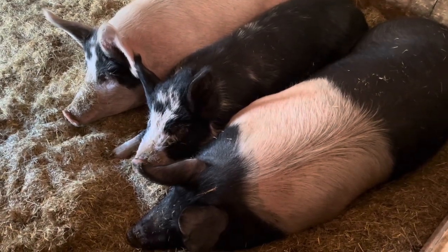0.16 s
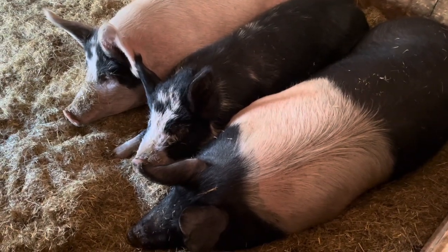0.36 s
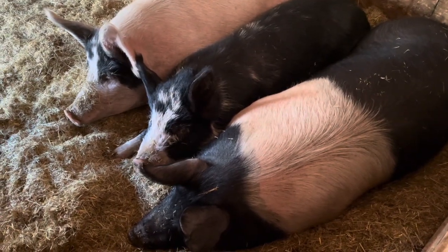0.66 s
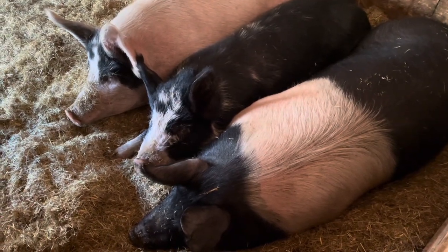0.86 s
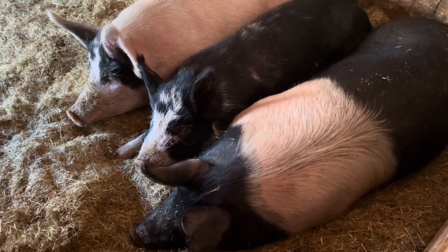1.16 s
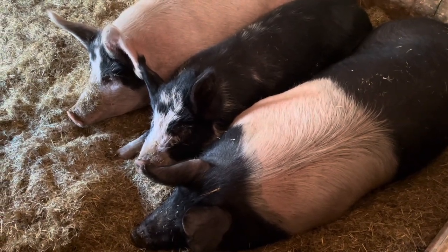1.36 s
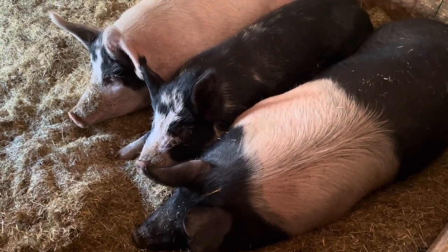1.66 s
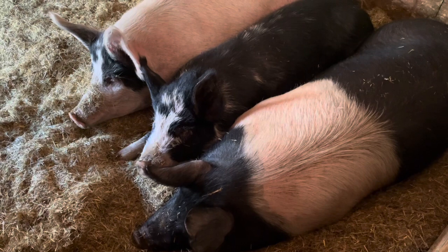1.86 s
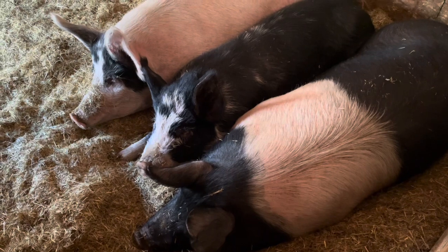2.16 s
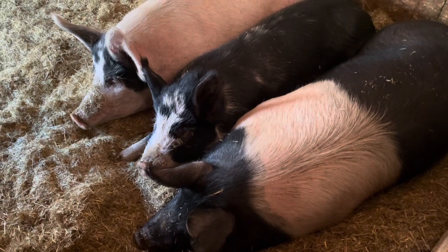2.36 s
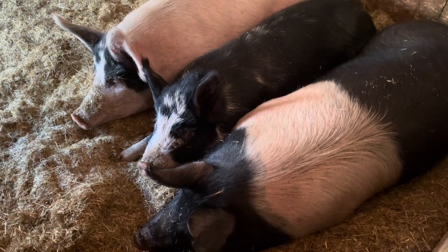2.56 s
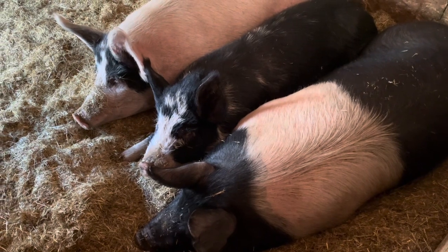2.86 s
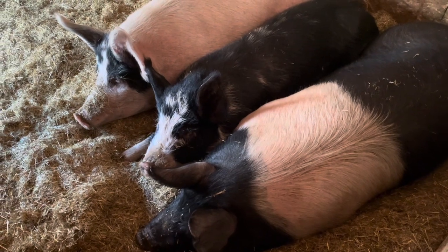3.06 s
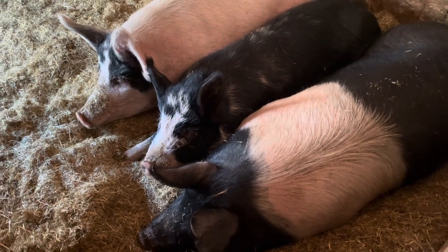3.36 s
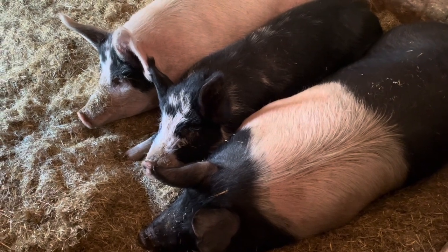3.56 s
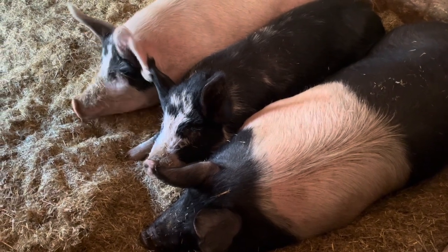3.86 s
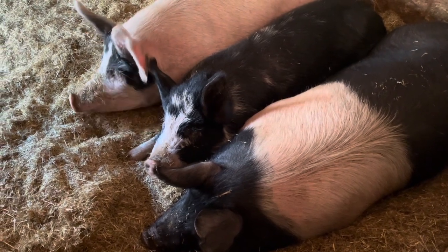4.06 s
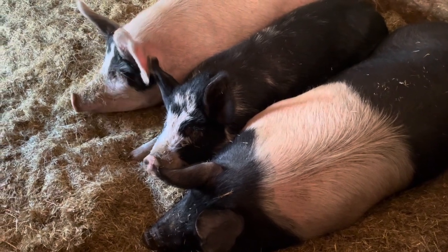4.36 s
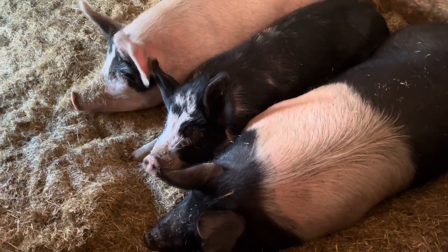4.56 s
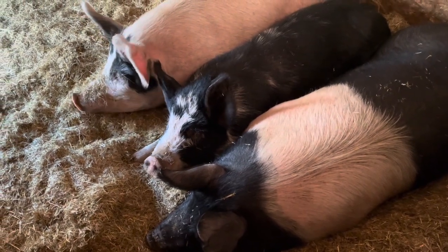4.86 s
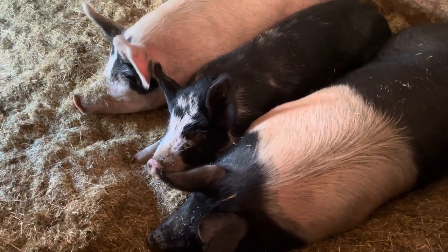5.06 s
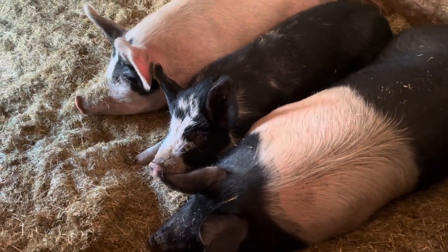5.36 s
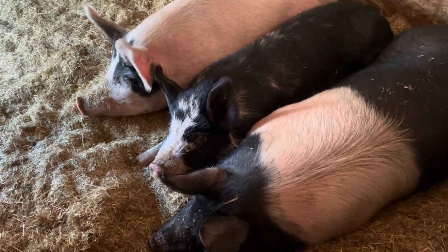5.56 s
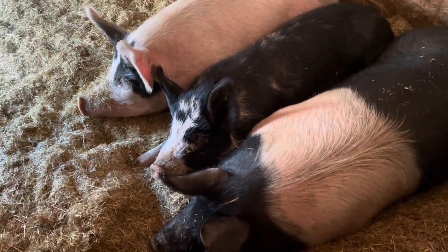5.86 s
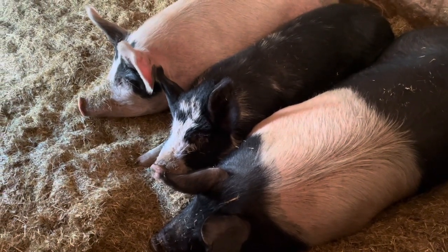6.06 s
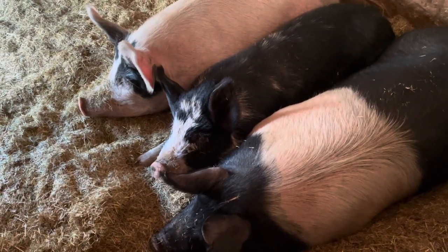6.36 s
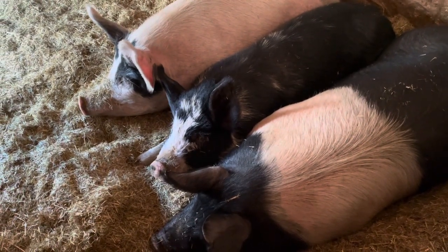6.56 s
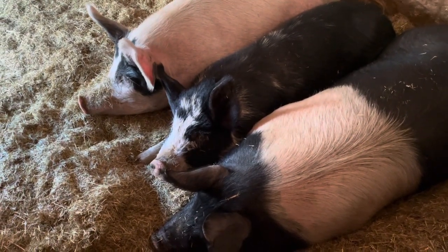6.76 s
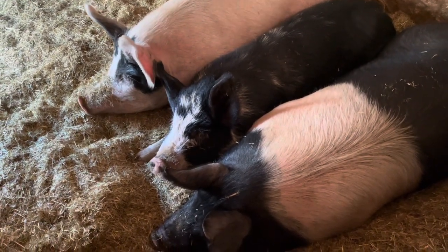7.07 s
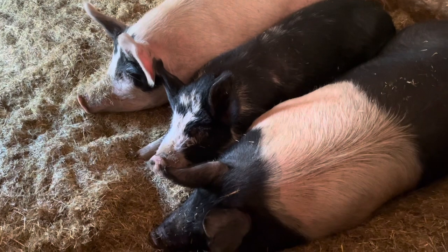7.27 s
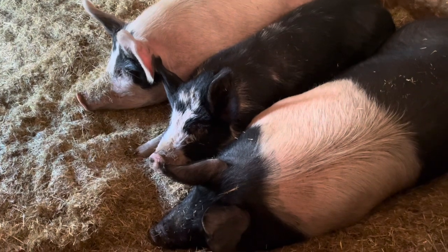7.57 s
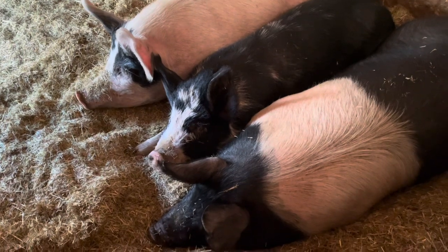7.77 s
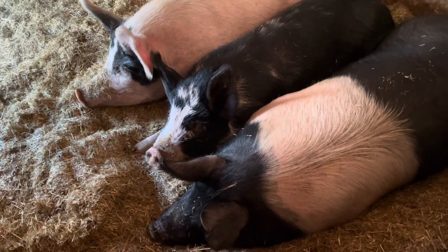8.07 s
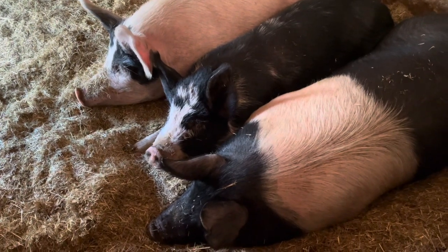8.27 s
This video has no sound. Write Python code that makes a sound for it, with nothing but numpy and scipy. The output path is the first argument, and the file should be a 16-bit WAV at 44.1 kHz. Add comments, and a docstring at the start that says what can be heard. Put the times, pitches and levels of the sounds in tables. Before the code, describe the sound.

A knock on boards opens a breezy barn scene, heard through a close, unprotected stereo microphone. A little electric motor whirs, then winds up longer and louder amid thick fluttering wind pops, ending in a sharp scrape. A quieter lull holds scattered gusts and a brief distant rattle of steel. Three short motor whines follow, with wheel hiss, skids and low drumming, over soft hum and airy hiss.

```python
"""Electric cart in a windy barn

Inside a breezy barn, with a small electric cart driving close by in five short bursts. Its gears whine with the
speed and its controller whistles at a fixed pitch: both are sums of sines. Its wheels hiss through straw (coloured
noise) and drum on boards (resonances). Wind eddies pop on the two microphone ports as short falling tones over
low noise; farther off a metal latch rattles once as ringing steel, and the barn hums behind it all."""
import sys
import numpy as np
from scipy import signal
from scipy.fft import rfft, irfft, next_fast_len
from scipy.io import wavfile
from scipy.ndimage import uniform_filter1d, map_coordinates

SR = 44100
rng = np.random.default_rng(int(sys.argv[2]) if len(sys.argv) > 2 else 0)


def to_wav(sig):
    """Store sig (one row per channel, or 1-D mono) as 16-bit WAV at the path in sys.argv[1].

    Samples outside -1..1 are clipped; the rate is SR.
    """
    pcm = np.clip(np.atleast_2d(sig), -1, 1) * 32767
    pcm = np.round(pcm).astype(np.int16)
    wavfile.write(sys.argv[1], SR, pcm.T)  # frames by channels


N = 370440  # length [samples]

# The cart's motor runs, one list each: (time [s], gear mesh [Hz], rolling level [dB])
MOTOR_RUNS = [
    [(.19, 1000, -79.5), (.24, 1300, -75), (.32, 1600, -64), (.4, 2110, -58.5), (.5, 2450, -56.5),
     (.62, 2640, -57), (.82, 2720, -55.5), (.9, 2520, -58.5), (1.0, 1810, -62.5), (1.12, 1190, -110)],
    [(1.25, 402, -100), (1.35, 498.5, -68), (1.62, 1360, -55.5), (1.67, 1490, -54), (1.73, 1570, -53),
     (1.81, 1640, -52.5), (1.975, 1660, -51), (2.1, 2380, -49.5), (2.19, 2770, -48), (2.27, 2910, -46),
     (2.4, 3060, -46.5), (2.55, 3170, -46.5), (2.72, 3230, -46.5), (2.9, 3250, -46.5), (2.97, 3000, -48.5),
     (3.05, 2484, -50), (3.12, 1970, -53), (3.19, 1475, -54.5)],
    [(5.43, 788, -98), (5.52, 1200, -67.5), (5.58, 1400, -54), (5.62, 1640, -53), (5.66, 1950, -52),
     (5.72, 2190, -52), (5.8, 2350, -48), (5.88, 2290, -53), (5.94, 2240, -66.5)],
    [(6.54, 1207, -76.5), (6.575, 1453, -57.5), (6.64, 2050, -52), (6.73, 2500, -49), (6.82, 2800, -48),
     (6.98, 3250, -45), (7.06, 3400, -43), (7.18, 3510, -43), (7.25, 3440, -45.5), (7.34, 3200, -67.5)],
    [(7.44, 1835, -64.5), (7.5, 2075, -52), (7.6, 2600, -51), (7.8, 3135, -47.5), (7.9, 3354, -47.5),
     (8.08, 3355, -46.5), (8.16, 3150, -48), (8.26, 2820, -73)],
]
# Tones of the gears: orders of the mesh frequency [ratio]
GEAR_ORDERS = [1, 2, .916, 1.144, 3, 1.432, 1.532, 1.897]
# Balance of the gear tones: (time [s], then the level of each order [dB])
GEAR_LEVELS = [(.2, 1, -6, -12, -20, -30, -30, -30, -30), (.45, 4, -2, -12, -20, -30, -30, -30, -30),
               (.85, 3, -1, -12, -20, -30, -30, -30, -30), (1.0, -6, -6, -12, -20, -30, -30, -30, -30),
               (1.59, -22, -12, -22, -20, -30, -30, -30, -30), (1.64, -4, 8, 6, -14, -14, -30, -30, -30),
               (1.78, -4, 5, 4, -14, -9, -30, -30, -30), (1.84, 2, 5, 1, -14, -3, -30, -30, -30),
               (1.96, 2, 0, 2, -14, -4, -30, -30, -30), (2.06, -3, -20, -1, -12, -30, -30, -30, -30),
               (2.2, 4, -20, 1, -9, -30, -20, -20, -12), (2.4, 2, -20, 1, -2, -30, -14, -14, -5),
               (2.48, -5, -20, -5, 5, -30, -10, -10, -3), (2.75, -3, -20, -2, 4, -30, -3, -7, 0),
               (2.87, -4, -20, -2, 2, -30, -4, -6, 0), (2.95, -8, -20, 3, -14, -30, -14, -12, -12),
               (3.2, -6, -20, 5, -15, -30, -30, -30, -30), (5.52, -6, 0, 4, -20, -30, -30, -30, -30),
               (5.62, 3, 5, 1, -20, -30, -30, -30, -30), (5.7, 0, 1, 3, -20, -30, -30, -30, -30),
               (5.8, -2, -4, -1, -20, -30, -30, -30, -30), (5.95, -4, -14, -4, -20, -30, -30, -30, -30),
               (6.55, -2, -4, -6, -10, -30, -30, -30, -30), (6.85, 0, 0, -2, -2, -30, -20, -20, -30),
               (6.98, 1, -14, -4, -6, -30, -10, -12, -30), (7.06, -8, -20, -12, 3, -30, -2, -5, -30),
               (7.2, -8, -20, -12, 3, -30, -4, -3, -30), (7.3, -12, -20, -14, -12, -30, -12, -8, -30),
               (7.45, -4, -13, -3, -10, -30, -30, -20, -30), (7.8, -5, -20, -6, 0, -30, -20, -2, -30),
               (7.9, -3, -20, 5, 0, -30, -20, -3, -30), (8.07, -3, -20, 7, -4, -30, -20, -6, -30),
               (8.16, -10, -20, -4, -12, -30, -20, -10, -30)]
# Where the whine swells or fades: (centre [Hz], width [Hz], boost [dB])
GEARBOX_RESONANCES = [(1500, 150, 6), (2100, 500, 4), (4020, 100, 7), (5150, 500, 10), (7000, 5000, -14)]
# Switching whistle of the speed controller: (start [s], end [s], level at start [dB], level at end [dB])
WHISTLE_SPANS = [(0.223, .3, -56, -50.5), (.3, 0.803, -49.5, -48), (1.274, 1.678, -65.5, -55),
                 (1.676, 2.147, -56.5, -58.5), (2.15, 2.9, -60.5, -63), (2.4, 2.44, -53, -56),
                 (2.68, 2.737, -52, -55), (5.481, 5.531, -61.5, -52.5), (5.53, 5.815, -64, -57.5),
                 (6.551, 6.974, -55, -55.5), (7.459, 7.539, -63, -53), (7.546, 8.035, -52, -51.5)]
SWITCH_HZ = 3917.5
WHISTLE_RISE_S, WHISTLE_FALL_S = .01, .09  # over 20 dB
USUAL_DB = -50  # the rolling level that the other parts of the cart refer to
WHINE_DB, WHINE_GROWS = -55.5, .75  # dB at the usual rolling level, dB more for each dB of rolling
SWEEP_KHZ_S = 3  # a tone sweeping this fast gets half of a resonance's boost


def motor():
    """Gear orders follow the speed and swell at the gearbox resonances; the controller's pitch stays fixed."""
    mesh_hz = uniform_filter1d(curves(np.vstack(MOTOR_RUNS))[0], size=SR // 28)  # inertia rounds the corners
    sweep_hz_s = np.abs(np.gradient(mesh_hz)) * SR
    shake_hz = 13 + .007 * sweep_hz_s  # the mesh chatters while the speed changes
    mesh_phase = 2 * np.pi * np.cumsum(mesh_hz + shake_hz * wobble(160)) / SR

    gears = 0
    for order, level_db in zip(GEAR_ORDERS, curves(GEAR_LEVELS)):
        tone_db = level_db + 3 * wobble(35) + 2.5 * wobble(12)
        for centre, width, boost_db in GEARBOX_RESONANCES:
            slow = 1 + (boost_db > 0) * sweep_hz_s / 1000 / SWEEP_KHZ_S  # fast sweeps excite it less
            tone_db = tone_db + boost_db * bump(order * mesh_hz, centre, width) / slow
        gears = gears + amp(tone_db) * np.sin(order * mesh_phase)
    gears = gears * amp(WHINE_DB + WHINE_GROWS * (rolling() - USUAL_DB)) * during(MOTOR_RUNS)

    switch_phase = 2 * np.pi * SWITCH_HZ * np.arange(N) / SR + 0.12 * wobble(24)
    spans = [held(*row, WHISTLE_RISE_S, WHISTLE_FALL_S) for row in WHISTLE_SPANS]
    whistle = np.max(spans, axis=0) * amp(3 + .7 * wobble(30))
    octave = amp(-15.5) * np.sin(2 * switch_phase + [[.9], [-.9]])  # reaches the two ports out of step
    third = amp(-34) * np.sin(3 * switch_phase)
    near_left = amp([[2.1], [-2.1]])
    return (gears + whistle * np.sin(switch_phase)) * near_left + whistle * (octave + third)


# Panels of the cart's shell that sing under load: (centre [Hz], width [Hz], level [dB])
SHELL_PANELS = [(1396, 65, -5.5), (1610, 55, -2)]
SING_DB, SING_GROWS = -69.5, 3  # dB at the usual rolling level, dB more for each dB of rolling


def panels():
    """Narrow noise in the shell's panels, growing fast with the load."""
    shaken = amp(1.7 * wobble(15)) * rng.standard_normal((2, N))
    ring = unit(modes(shaken, SHELL_PANELS))
    shared = ring[0] * amp([[1.5], [-1.5]])
    opposed = .4 * ring[1] * [[1], [-1]]
    level = amp(SING_DB + SING_GROWS * (rolling() - USUAL_DB)) * during(MOTOR_RUNS)
    return level * (shared + opposed)


# Rolling while the motor is off: (time [s], rolling level [dB])
COASTING = [(0, -82), (3.27, -44), (3.44, -45.5), (3.58, -77.5), (4.33, -80.5), (4.58, -60), (4.8, -65.5),
            (5.2, -78.5), (8.4, -76)]


def rolling():
    """Rolling level in dB, driven or coasting."""
    driven = [(s, db) for run in MOTOR_RUNS for s, _, db in run]
    return curves(sorted(COASTING + driven))[0]


# Lowest layer of the wheel noise: (frequency [Hz], relative level per Hz [dB])
GRIND_SPECTRUM = [(410, -10.5), (700, 2.5), (870, -13), (1000, -5.5), (1310, -2.5), (1610, -8.5),
                  (1900, -7), (2600, -12), (3400, -24), (5700, -120)]
# Middle layer of the wheel noise: (frequency [Hz], relative level per Hz [dB])
HISS_SPECTRUM = [(1350, -12), (2300, -7.5), (2850, 2), (3750, 1.5), (4300, -0.5), (5900, -1.5), (7000, -2),
                 (8300, -3.5), (8800, 0.5), (11400, -13.5), (19400, -120)]
# Highest layer of the wheel noise: (frequency [Hz], relative level per Hz [dB])
FIZZ_SPECTRUM = [(5180, -41), (8800, -48), (9720, 8.5), (10200, 3), (14000, -2.5), (15800, -9)]
# Left-right likeness of the broad noises: (frequency [Hz], likeness [-1 to 1, clipped])
LIKENESS = [(700, -0.099), (1170, -0.23), (1800, 0.57), (2700, -0.031), (4200, 0.028), (6400, -0.1),
            (7900, -0.45), (8400, -1.2), (9200, -0.99), (9900, -0.51), (11500, 0.11), (13000, 1)]
# How far the wheels sit to the left: (frequency [Hz], left minus right [dB])
LEFT_LEAN = [(640, 0), (1400, 2.5), (3100, 3.5), (5500, 6.5), (8000, 3), (10000, -1)]
# Resonances of the cart's shell: (centre [Hz], width [Hz], boost [dB])
SHELL_RESONANCES = [(1434, 25, 6), (1615, 31, 10), (5050, 300, 4), (5780, 140, 6)]
# dB at the usual rolling level, and dB more for each dB of rolling, both beside the rolling level
GRIND_DB, GRIND_GROWS, FIZZ_DB, FIZZ_GROWS = -0.5, -0.31, -2.5, 0.27
DRIVEN_DB = 2  # the grind gains this much while the motor pulls


def wheels():
    """Broad rolling noise in three layers, nearer the left port; louder rolling is brighter."""
    rolling_db = rolling()
    over_db = rolling_db - USUAL_DB
    grind_db = GRIND_DB + GRIND_GROWS * over_db + DRIVEN_DB * during(MOTOR_RUNS)
    grind = amp(grind_db) * spread(patchy(2.5), GRIND_SPECTRUM, LIKENESS)
    hiss = amp(0.5) * spread(patchy(1.67), HISS_SPECTRUM, LIKENESS)
    fizz = amp(FIZZ_DB + FIZZ_GROWS * over_db) * spread(patchy(1.5), FIZZ_SPECTRUM, LIKENESS)

    def shell_and_lean(hz):
        shell_db = sum(db * bump(hz, centre, width) for centre, width, db in SHELL_RESONANCES)
        return amp(shell_db + along(LEFT_LEAN, hz) / 2 * np.array([[1], [-1]]))

    return filtered(amp(rolling_db) * (grind + hiss + fizz), shell_and_lean)


# Wheels jolt or skid: (time [s], level [dB], length scale [s], hollow share of the power [0-1])
WHEEL_SKIDS = [(0.325, -46.5, 0.038, .8), (0.563, -40, 0.016, 0.84), (.59, -45.5, 0.016, .9),
               (0.641, -36, 0.021, 0.8), (0.793, -50, 0.027, .9), (3.417, -23.5, 0.049, .1),
               (6.581, -30.5, 0.018, 0), (5.79, -41, 0.025, .8), (5.857, -33, 0.029, 0.38),
               (7.06, -35.5, 0.2, 0.14), (7.25, -28.5, 0.02, 0.05), (8.136, -25, 0.041, 0.26)]
# What a jolt rings in the cart's frame: (centre [Hz], width [Hz], level [dB])
FRAME_MODES = [(1235, 190, 0.5), (1585, 170, 1.5), (1970, 270, 0)]


def skids():
    """Short scrapes, part broad, part ringing hollow in the frame."""
    shape, t = np.zeros((2, N + SR)), np.arange(SR // 2) / SR
    for s, db, length, hollow in WHEEL_SKIDS:
        share = np.sqrt(np.clip([[1 - hollow], [hollow]], 0, 1))
        swell = t / length * np.exp(-3 * t / length)
        shape[:, round(s * SR):][:, :len(t)] += share * amp(db + 10.0) * swell
    # both spectra: (frequency [Hz], relative level per Hz [dB])
    broad_spectrum = [(500, 3), (1100, -1.5), (1900, -4.5), (3300, -6), (7000, -9), (12000, -16)]
    ring_spectrum = [(700, -10), (1100, 1), (2300, -1), (4500, -12)]
    broad = spread(rng.standard_normal((2, N)), broad_spectrum, LIKENESS)
    ring = spread(modes(rng.standard_normal((2, N)), FRAME_MODES), ring_spectrum, LIKENESS)
    return shape[0, :N] * broad + shape[1, :N] * ring


# Boards drumming under the wheels:
# (start [s], end [s], low modes at start [dB], at end [dB], upper modes re low [dB])
DRUM_SPANS = [(0.384, 0.75, -41, -31, -27.5), (.72, 1.046, -35, -37.5, -40), (5.665, 5.906, -46, -40, -11),
              (6.78, 7.262, -32.5, -26, -14.5)]
# A knock on the boards and its bounce: (time [s], level [dB])
KNOCKS = [(0.121, -14.5), (0.156, -32)]
# Low modes of the boards: (centre [Hz], width [Hz], level [dB])
LOW_MODES = [(76.5, 14.5, -8), (97, 22.5, 1), (110.7, 16.8, 5), (140.6, 7.6, -4), (234.7, 14, -15.5),
             (311.2, 9.2, -8.5), (367, 15, -22)]
# Upper modes of the boards: (centre [Hz], width [Hz], level [dB])
HIGH_MODES = [(560, 17, 2.5), (642, 16, 5), (679, 44, -7.5)]
DRUM_RISE_S, DRUM_FALL_S = 0.15, 0.05  # over 20 dB


def drumming():
    """Uneven bumps keep the boards' resonances ringing; a knock and its bounce come first."""
    bumps = amp(0.6 * wobble(30)) * rng.standard_normal((2, 2, N))
    low = spread(modes(bumps[0], LOW_MODES), [(100, 0)], [(100, 0.93), (400, 0.71)])
    high = spread(modes(bumps[1], HIGH_MODES), [(600, 0)], [(600, 0.46)])
    low_gains = np.array([held(*row[:4], DRUM_RISE_S, DRUM_FALL_S) for row in DRUM_SPANS])
    high_gains = low_gains * amp(DRUM_SPANS)[:, 4:]
    drum = low_gains.max(axis=0) * low + high_gains.max(axis=0) * high
    blow = np.zeros(N)
    for s, db in KNOCKS:
        blow[round(s * SR):][:90] = amp(db + 16.0) * np.hanning(90)
    return drum + modes(blow, LOW_MODES) + amp(-20.5) * modes(blow, HIGH_MODES)


# Slow rise and fall of the low rumble, the knock's tail included: (time [s], buffet level [dB])
RUMBLE_LEVEL = [(0, -56), (.06, -85), (.12, -38.5), (.3, -57), (.39, -42.5), (.77, -45.5), (1.27, -50),
                (1.4, -43), (2.05, -35), (2.3, -35.5), (2.7, -32), (3.4, -39), (3.78, -46), (3.97, -45.5),
                (4.14, -55), (4.22, -53.5), (4.95, -56.5), (5.4, -53), (5.78, -35), (5.97, -46.5),
                (6.1, -44.5), (6.6, -41.5), (7.18, -32), (7.33, -48), (7.6, -49.5), (7.8, -39.5),
                (8.4, -45.5)]
# Low rumble of the wind: (frequency [Hz], relative level per Hz [dB])
BUFFET_SPECTRUM = [(13, -55), (22, -29), (37, -6.5), (49, 2), (81, 3.5), (119, -1.5), (260, -14.5),
                   (340, -21), (570, -120)]
# Higher flapping of the wind: (frequency [Hz], relative level per Hz [dB])
FLUTTER_SPECTRUM = [(65, -36), (110, 2.5), (162, -10), (408, -3), (529, -12.5), (1020, -31.5), (1200, -28),
                    (1560, -59), (2640, -120)]
# Single pops of the wind, and two faint ticks: (time [s], level [dB], snap re level [dB], thump re level [dB])
SINGLE_POPS = [(1.223, -41, -29, 10), (1.291, -39, -29, -1), (1.322, -37, -29, -4), (1.346, -30, -29, -2),
               (1.409, -30.5, -23, -10), (1.428, -40, -25, -2), (1.462, -42, -15, -10),
               (1.487, -18.5, -30, -22), (1.524, -21.5, -7, -7), (1.62, -24.5, -23, -9),
               (1.713, -23, -16, -12), (1.806, -25.5, -13, -10), (1.926, -33, -20, -11),
               (1.98, -40, -22, 2), (2.03, -22.5, -21, -15), (2.087, -22.5, -11, -9),
               (2.138, -26.5, -1, -9), (2.195, -25.5, 3, -12), (2.309, -23.5, -2, -12),
               (2.352, -19, -5.5, -1), (2.395, -21, 4, -14), (2.421, -38, 13.5, -10), (2.48, -21, -10, -12),
               (2.505, -17.5, 1, -16), (2.537, -24, 1, -10), (2.627, -16.5, -2.5, -5),
               (2.655, -16.5, 0.5, 1), (2.696, -14, -0.5, -6), (2.735, -22.5, 4, -8),
               (2.754, -25.5, 1, -12), (2.81, -29, -5, -16), (2.837, -15.5, -3, -6), (2.869, -20, -0.5, -7),
               (2.968, -19.5, -10, -15), (3.042, -19.5, -22, 1), (3.146, -21, -4, -12),
               (3.196, -18, -9, -5), (3.229, -16.5, -7, -10), (3.244, -17, -7, -3), (3.35, -19, -5.5, -6),
               (3.376, -15.5, -9, -9), (3.412, -18, -2.5, -16), (3.458, -17.5, -10, -12),
               (3.515, -20, -17, -3), (3.569, -21.5, -26, -12), (3.629, -30.5, -1, -11),
               (3.64, -30, -20, -10), (3.665, -32, -25, -8), (3.713, -22, -28, -10),
               (3.757, -34.5, -26, 15.5), (3.841, -28.5, -12, -15), (3.856, -27, -25, 1),
               (3.868, -35, -7, -8), (4.071, -26, -22, -4), (4.087, -29, -17, -16), (4.101, -36, -28, 3),
               (4.135, -17, -17, -1), (4.246, -41, -5, -17), (4.375, -52.5, 16, -10),
               (4.557, -47, 11.5, -15), (4.658, -29.5, -18, 3.5), (4.736, -25, -21, -7),
               (5.394, -35, -15, -12), (5.476, -31, -24, -4), (5.517, -19, -12.5, -16),
               (5.544, -30, -14, -12), (5.622, -31.5, -16, -5), (5.792, -25, -14, -14),
               (6.075, -30.5, -23, -8), (6.357, -30.5, -11, -7), (6.408, -24, -13, 0),
               (6.477, -34, -26, -13), (7.233, -20, -12, -16), (7.332, -18, -24, -19),
               (7.406, -24.5, -20, -20), (7.5, -17, -8.5, -4), (7.644, -26, -28, 1.5),
               (7.72, -15, -29, -16), (7.776, -21.5, -23, -14), (7.81, -31, -20, -15),
               (8.013, -22.5, -24, -6), (8.074, -24, -20, -7), (8.233, -19, -6, -21), (8.256, -22, -8, -14),
               (8.31, -28, -26, -9), (8.337, -24.5, -16, -2.5)]
BREEZE_DB = -40  # the buffet level that the flutter refers to
FLUTTER_DB, FLUTTER_GROWS = -3, 0.69  # dB beside the buffet, dB more for each dB of buffet
GUST_DB, GUST_S = -19.5, 0.024  # swell of turbulence around a single pop: re its level, time scale


def wind():
    """Lumpy turbulence that swells around the single pops, and a crowd of small ones; more wind flutters more."""
    rumble_db, = curves(RUMBLE_LEVEL)
    s, db, snap_db, thump_db = np.transpose(SINGLE_POPS)
    around = np.arange(-SR // 10, SR // 10 + 1) / SR
    swell = np.exp(-(around / GUST_S - .5) ** 2)
    impulses = np.bincount((s * SR).astype(int), amp(db + GUST_DB), N)
    gusts = np.abs(signal.fftconvolve(impulses, swell, "same"))
    buffet_db = 20 * np.log10(amp(rumble_db) + gusts)
    flutter_db = buffet_db + FLUTTER_DB + FLUTTER_GROWS * (buffet_db - BREEZE_DB)

    lumps = np.array([wobble(28), wobble(34)]) + 0.44 * wobble(28)  # partly shared by the ports
    noise = rng.standard_normal((2, 2, N))
    buffet = amp(buffet_db) * spread(amp(1.6 * lumps) * noise[0], BUFFET_SPECTRUM, [(60, 0.81)])
    flutter_alike = [(150, 0.97), (400, 0.76), (800, 0.15)]
    flutter = amp(flutter_db - 7.5) * spread(amp(5.6 * lumps) * noise[1], FLUTTER_SPECTRUM, flutter_alike)

    when, size, snap = rng.uniform(0, 1, (300, 3)).T
    at = (when * (N - 1)).astype(int)
    small_db = flutter_db[at] + 8.5 - 3.9 * np.log(1.02 - size)  # a few stand out
    small_thump_db = (buffet_db - flutter_db)[at] - 3.0
    small = np.transpose([at / SR, small_db, -5.5 - 12 * snap, small_thump_db])
    single = np.transpose([s, db + 9.5, snap_db, thump_db])
    return buffet + flutter + eddies(small) + eddies(single)


def eddies(rows):
    """Each eddy snaps, falls in pitch and thumps as it passes the ports; rows of (time [s], three levels [dB])."""
    out, t = np.zeros((2, N + SR)), np.arange(SR // 12) / SR
    variety = rng.uniform(-0.86, 1, (len(rows), 4))
    for (s, db, snap_db, thump_db), (size, pitch, tilt, lag) in zip(rows, variety):
        length = 0.01557 * 1.146 ** size
        body = swoop(t, 480 * 1.15 ** pitch, 120.0, length, 1.0 * tilt, 0.67 * lag)
        snap = swoop(t, 950 * 1.2 ** pitch, 480, 0.37 * length, 1.8 * tilt, 1.2 * lag)
        thump = swoop(t, 164.0, 78 * 1.25 ** pitch, 2.0 * length, 1.3 * tilt, 0.2 * lag)
        eddy = body + amp(snap_db) * snap + amp(thump_db) * thump
        out[:, round(s * SR):][:, :len(t)] += amp(db) * eddy
    return out[:, :N]


def swoop(t, start_hz, end_hz, length, tilt_db, lag):
    """A short falling tone at both ports, slightly unequal in strength and phase."""
    port = np.array([[1], [-1]])
    fallen = 0.3253 * length * (1 - np.exp(-t / (0.31 * length)))
    phase = 2 * np.pi * (end_hz * t + (start_hz - end_hz) * fallen)
    envelope = (t / length) ** 0.97 * np.exp(-2.6 * t / length)
    return amp(tilt_db * port) * envelope * np.sin(phase + lag * port)


# Contacts of the latch: (time [s], level [dB], brightness [dB per octave])
CONTACTS = [(4.997, -53, -6), (5.011, -38.5, -2), (5.038, -35.5, -1), (5.052, -41, 1), (5.068, -27.5, -2),
            (5.084, -35, -2), (5.091, -36.5, -1.5), (5.105, -41, 1.5), (5.125, -48, 0), (5.139, -47.5, 4.5),
            (5.174, -59, 4)]
# Modes of its steel: (frequency [Hz], level [dB], decay by 60 dB [s])
STEEL_MODES = [(473, 0, 0.03), (660, 8, 0.02), (790, 8, .035), (1210, 1, 0.07), (1245, -5, .045),
               (1560, -8, 0.03), (2000, -4, 0.025), (2141, -3, 0.045), (2694, 4, 0.026), (2790, 6, 0.022),
               (3020, -6, 0.025), (3305, -7, .025), (3386, -7, .03), (4005, -8, 0.025), (4800, -17, 0.035),
               (5250, -15, 0.025)]


def latch():
    """Each contact rings the steel at new strengths, with a short crack; the barn answers."""
    bar, t = np.zeros(N + SR), np.arange(SR // 3) / SR
    for s, db, bright_db in CONTACTS:
        ring = 0
        for hz, level, t60 in STEEL_MODES:
            mode_db = level + bright_db * np.log2(hz / 1200) + rng.normal(0, 3)
            ring = ring + amp(mode_db - 60 * t / t60) * np.sin(2 * np.pi * hz * t)
        crack = 0.82 * amp(-60 * t / 0.0069) * rng.standard_normal(len(t))
        onset = 1 - np.exp(-t / 0.00032)
        bar[round(s * SR):][:len(t)] += amp(db - 14.5) * (ring + crack) * onset
    bar = filtered(bar[:N], lambda hz: 1 / (1 + 1j * hz / 5500) ** 2)  # dulled by distance
    tail = rng.standard_normal((2, len(t))) * amp(-60 * t / 0.11)
    echo = signal.fftconvolve(bar[None, :], tail / np.linalg.norm(tail[0]), axes=1)[:, :N]
    return bar * amp([[2.5], [-2.5]]) + amp(1.5) * echo


# Hum of the barn: (frequency [Hz], relative level per Hz [dB])
BARN_SPECTRUM = [(59, -31.5), (100, -3), (189, -24), (341, 0), (605, -7.5), (848, -10.5), (1710, -24.5),
                 (2610, -33), (5240, -34.5), (7050, -47.5), (7830, -54), (13000, -35), (15800, -79)]
# Level of the background hiss above 8.5 kHz: (time [s], level [dB])
BACKGROUND_TREBLE = [(0, -1), (1.05, -5), (1.3, -9), (3.6, 4), (5.4, -0.5), (6.0, 1), (6.5, 3), (8.4, 5)]
BARN_DB = -57  # before the hiss above 8.5 kHz gets its own level


def barn():
    """The hum of the barn, coloured noise, with a background hiss above 8.5 kHz that rises and falls."""
    air = amp(BARN_DB) * spread(patchy(2.5), BARN_SPECTRUM, [(200, 0.68)] + LIKENESS)
    treble = filtered(air, lambda hz: hz > 8500)
    return air - treble + amp(curves(BACKGROUND_TREBLE)[0]) * treble


def amp(db):
    """Amplitude of a level in dB."""
    return 10 ** (np.asarray(db) / 20)


def unit(x):
    """x scaled to rms 1."""
    return x / np.sqrt(np.mean(x ** 2) + 1e-20)


def along(points, hz):
    """Values of (frequency [Hz], value) points, read on a log axis."""
    f, v = np.transpose(points)
    return np.interp(np.log(hz + 1), np.log(f + 1), v)


def bump(hz, centre, width):
    """A resonance's share of its boost: 1 at the centre, half at the edges of the width."""
    return 1 / (1 + (2 * (hz - centre) / width) ** 2)


def curves(rows):
    """One value per sample for each column after the time."""
    s, *cols = np.transpose(rows)
    return [np.interp(np.arange(N) / SR, s, c) for c in cols]


def during(spans):
    """1 inside each table's time span, fading to 0 at its ends."""
    t, fade_s = np.arange(N) / SR, .015
    return sum(np.clip(np.minimum(t - s[0][0], s[-1][0] - t) / fade_s, 0, 1) for s in spans)


def held(start, end, first_db, last_db, rise, fall):
    """A gain gliding from first_db to last_db; it climbs 20 dB per rise [s] before, drops 20 dB per fall [s] after."""
    t = np.arange(N) / SR
    outside = np.maximum(0, np.maximum((start - t) / rise, (t - end) / fall))
    return amp(np.interp(t, [start, end], [first_db, last_db]) - 20 * outside)


def wobble(rate):
    """A smooth random curve, rate knots a second."""
    knots = rng.standard_normal(int(N * rate / SR) + 4)
    return map_coordinates(knots, [np.arange(N) * rate / SR])


def filtered(x, response):
    """x times a complex response of frequency."""
    m = next_fast_len(N + SR // 2)
    return irfft(rfft(x, m) * response(np.fft.rfftfreq(m, 1 / SR)), m)[..., :N]


def modes(x, table):
    """x through resonances of alternating sign; rows of (centre [Hz], width [Hz], level [dB])."""
    def response(f):
        total = 0
        for k, (c, w, db) in enumerate(table):
            total = total + (-1) ** k * amp(db) * 1j * f * w / (c * c - f * f + 1j * f * w)
        return total

    return filtered(x, response)


def spread(pair, spectrum, alike):
    """Two unrelated signals coloured and mixed to a left-right likeness; rms 1."""
    def colour(hz):
        turn = np.arccos(np.clip(along(alike, hz), -1, 1)) / 2
        return amp(along(spectrum, hz)) * np.array([np.cos(turn), np.sin(turn)])

    mid, side = filtered(pair, colour)
    return unit(np.array([mid + side, mid - side]))


def patchy(depth_db):
    """Two noises sharing patches of random gain in time and frequency."""
    z = signal.stft(rng.standard_normal((2, N)), nperseg=512)[2]
    field = uniform_filter1d(uniform_filter1d(rng.standard_normal(z.shape[1:]), 6, 0), 12, 1)
    return signal.istft(z * amp(depth_db * unit(field)), nperseg=512)[1][:, :N]


def scene():
    """The cart close by, the wind at the microphone, the latch farther off and the barn around them."""
    cart = motor() + panels() + wheels() + skids() + drumming()
    return cart + wind() + latch() + barn()


TOP_HZ = 15800


def record(dry):
    """The microphone chain passes nothing above its band limit."""
    return filtered(dry, lambda hz: hz < TOP_HZ)


dry = scene()
out = record(dry)
to_wav(out)
```